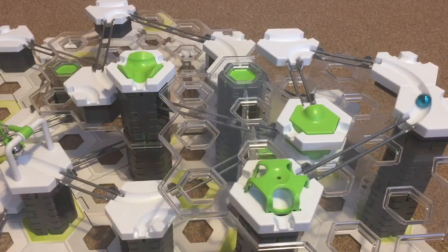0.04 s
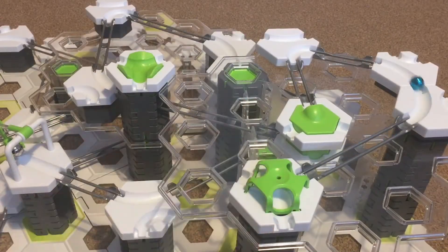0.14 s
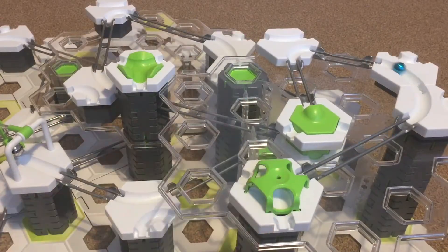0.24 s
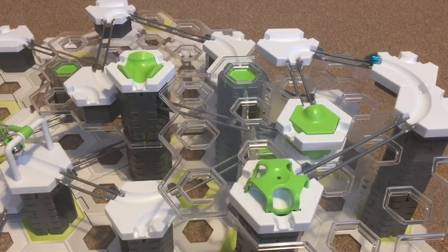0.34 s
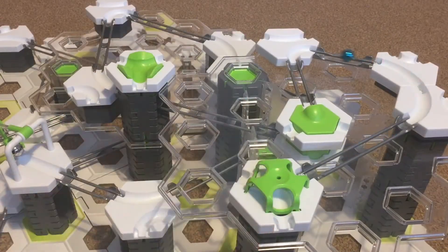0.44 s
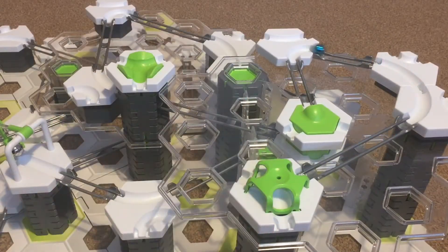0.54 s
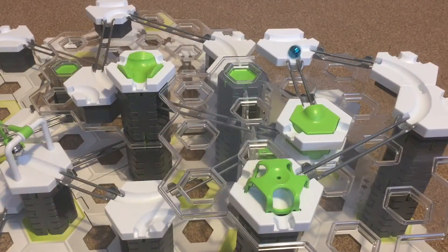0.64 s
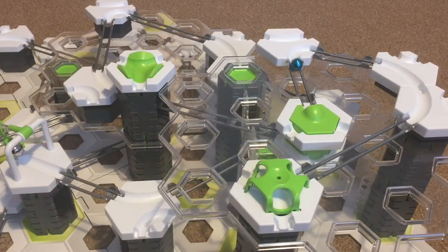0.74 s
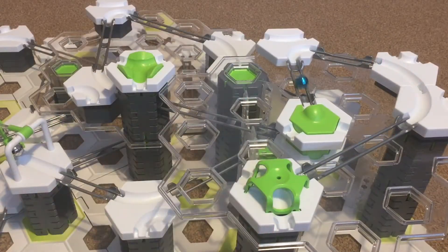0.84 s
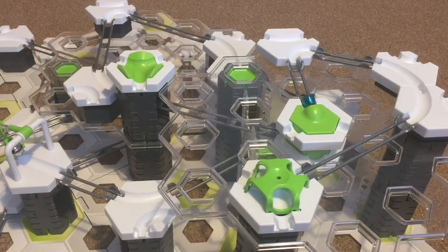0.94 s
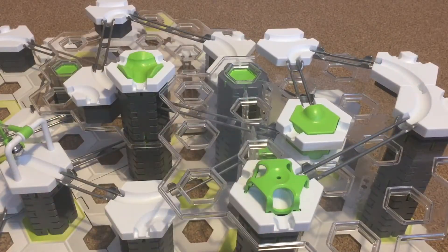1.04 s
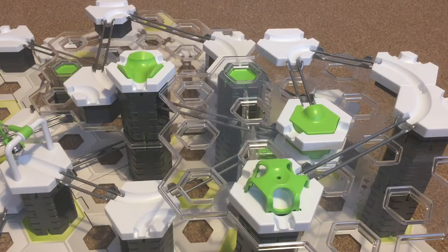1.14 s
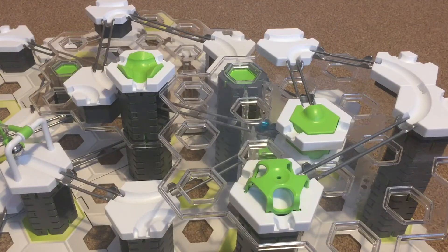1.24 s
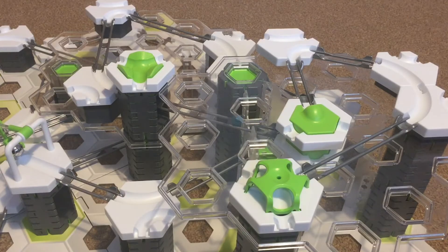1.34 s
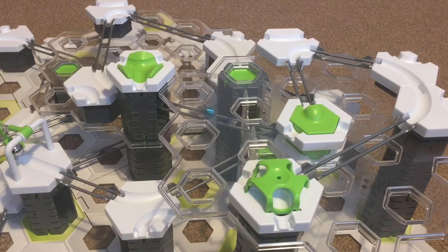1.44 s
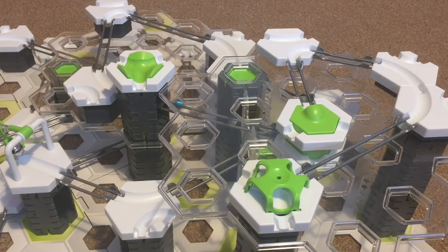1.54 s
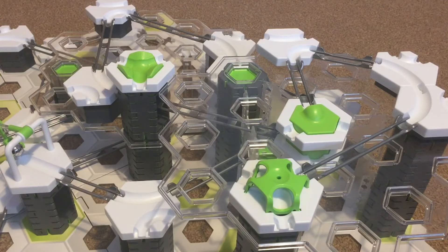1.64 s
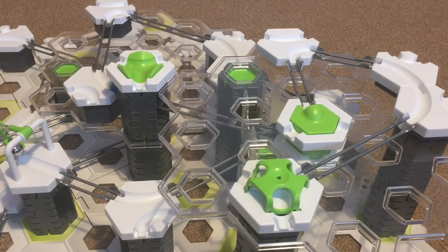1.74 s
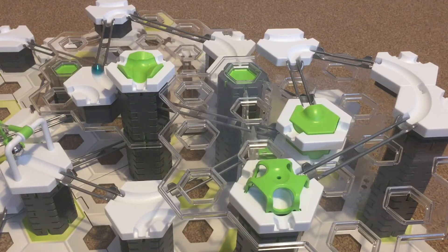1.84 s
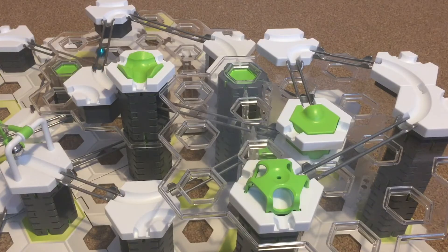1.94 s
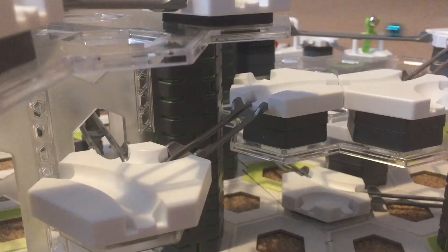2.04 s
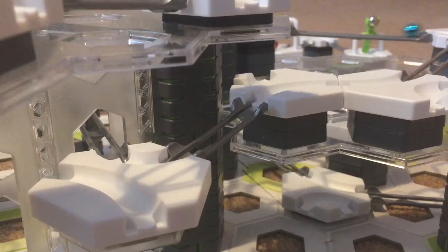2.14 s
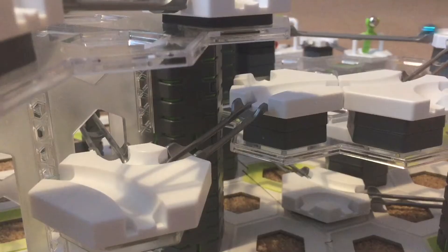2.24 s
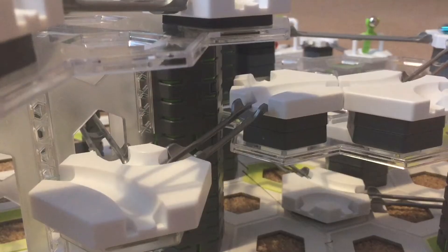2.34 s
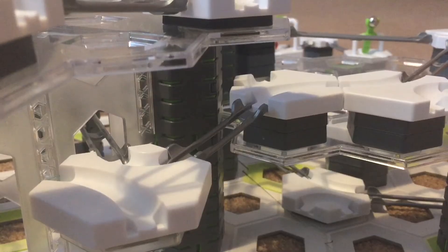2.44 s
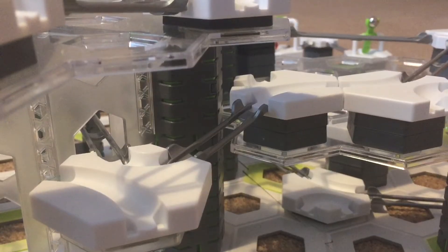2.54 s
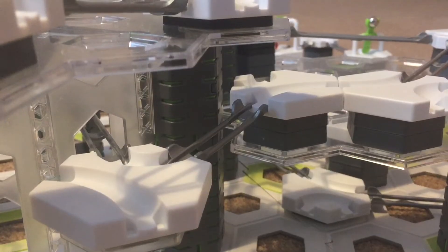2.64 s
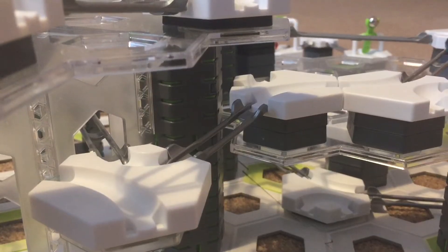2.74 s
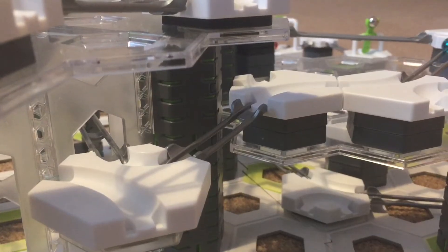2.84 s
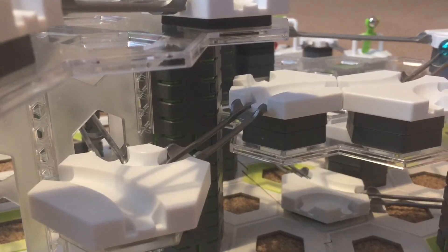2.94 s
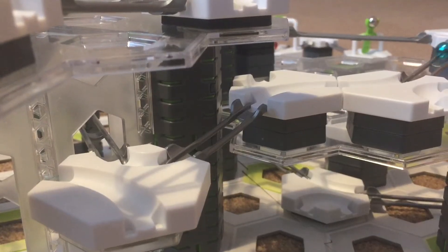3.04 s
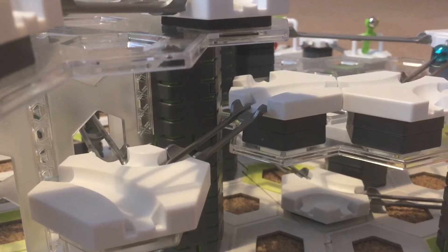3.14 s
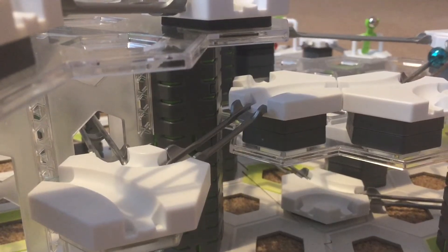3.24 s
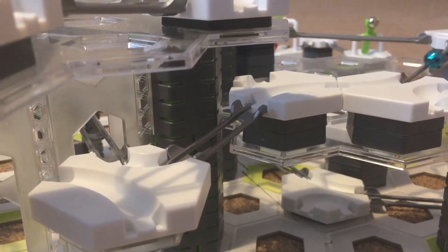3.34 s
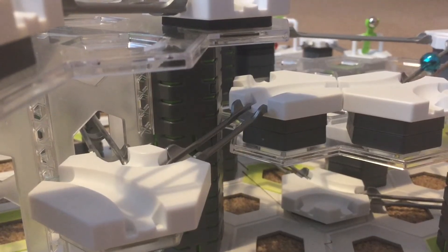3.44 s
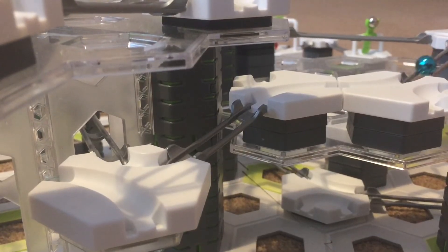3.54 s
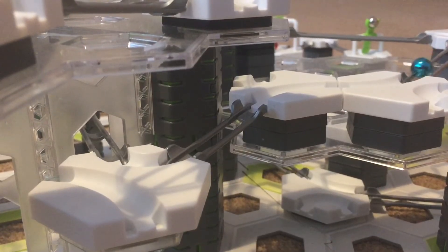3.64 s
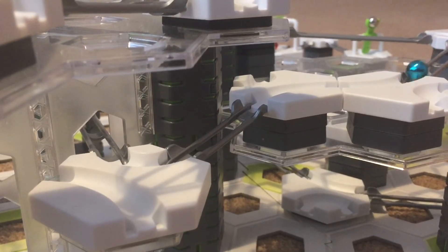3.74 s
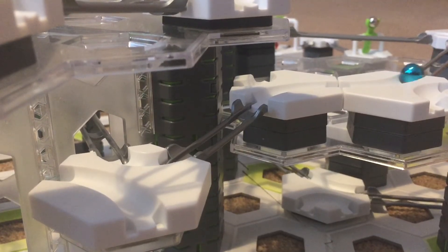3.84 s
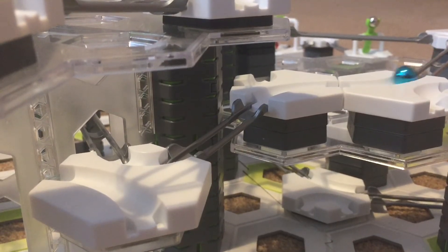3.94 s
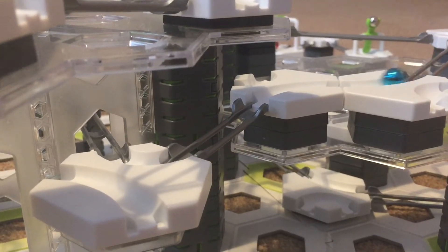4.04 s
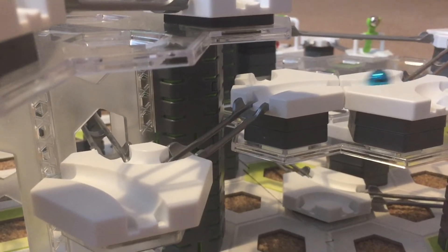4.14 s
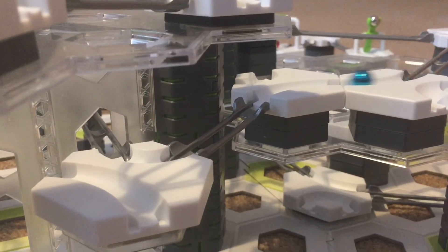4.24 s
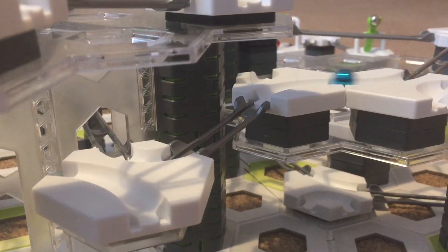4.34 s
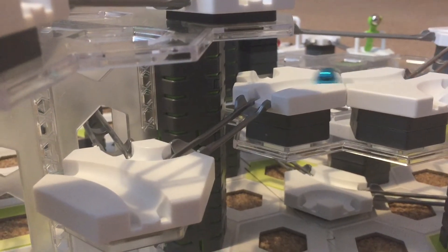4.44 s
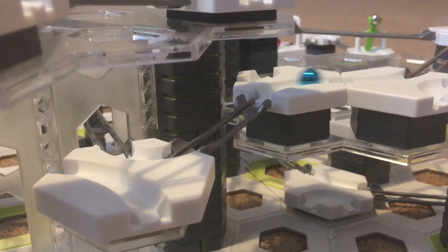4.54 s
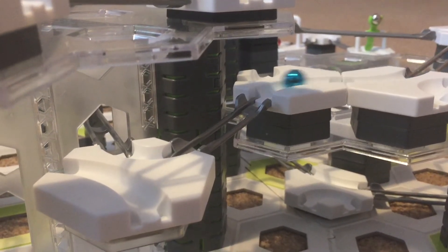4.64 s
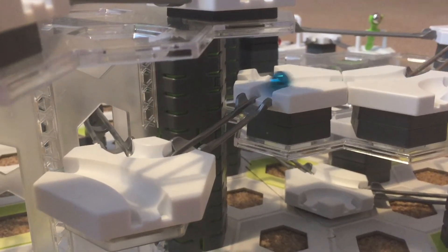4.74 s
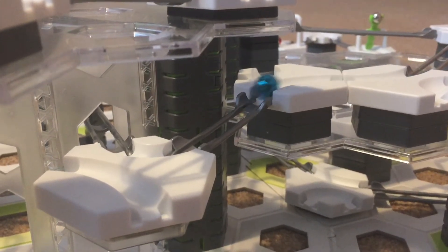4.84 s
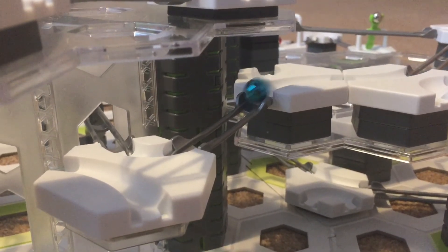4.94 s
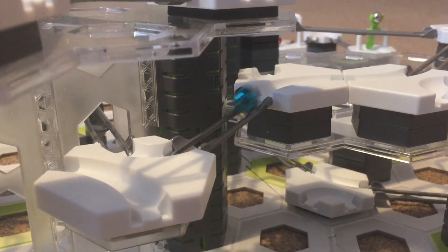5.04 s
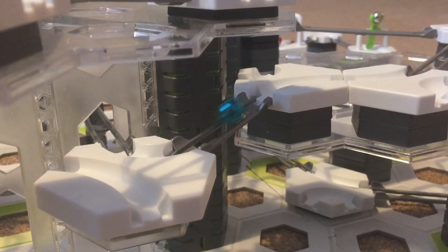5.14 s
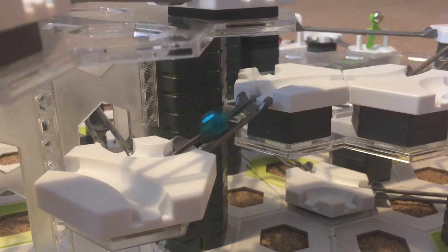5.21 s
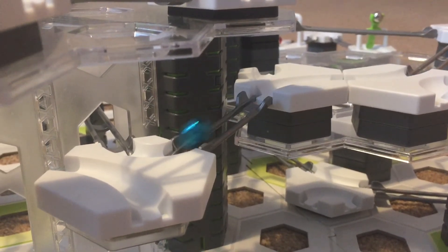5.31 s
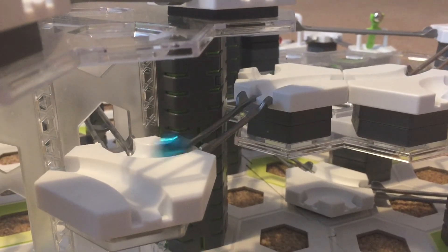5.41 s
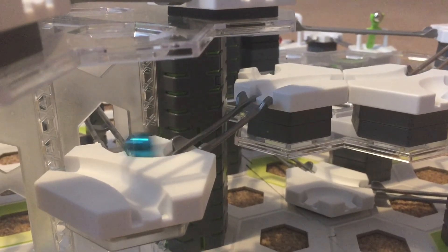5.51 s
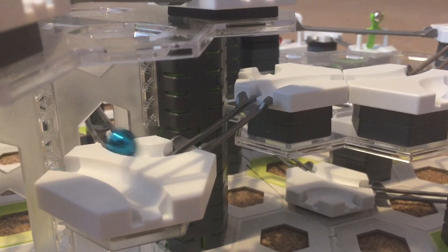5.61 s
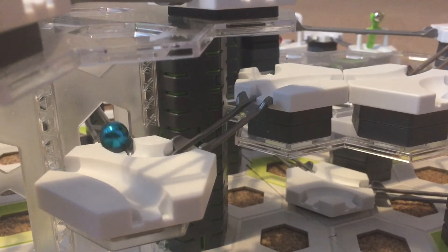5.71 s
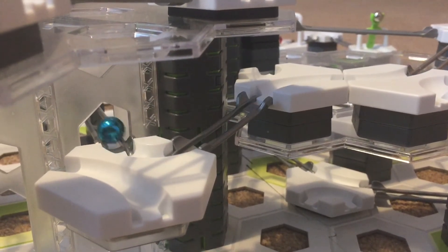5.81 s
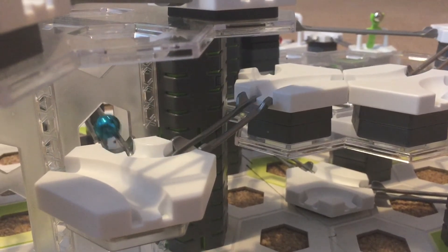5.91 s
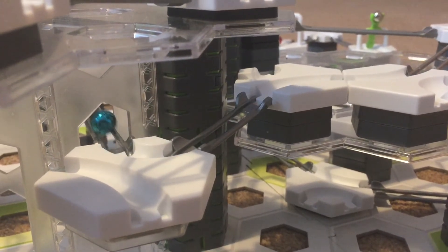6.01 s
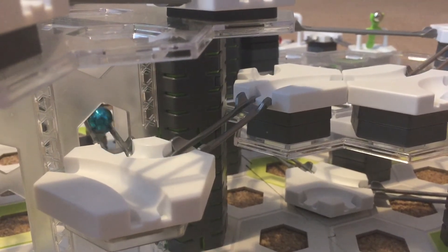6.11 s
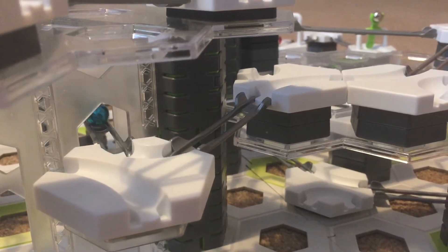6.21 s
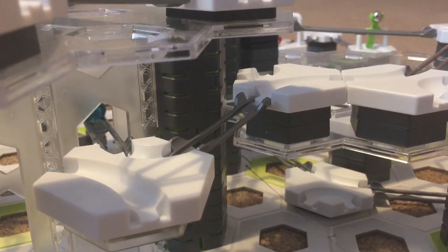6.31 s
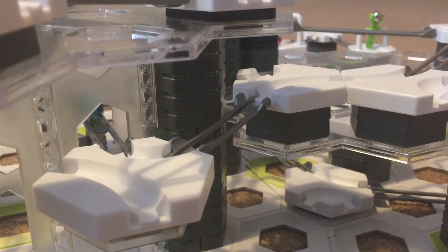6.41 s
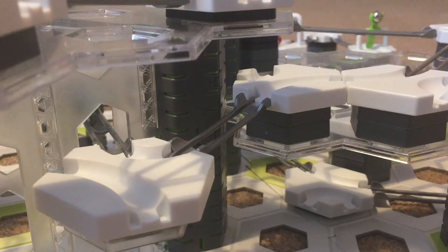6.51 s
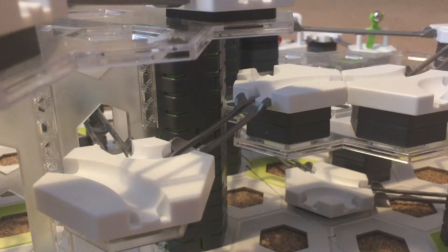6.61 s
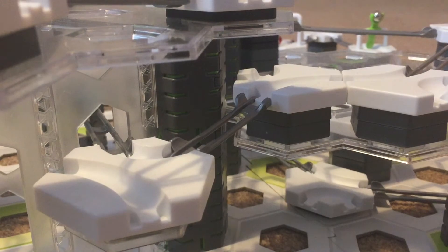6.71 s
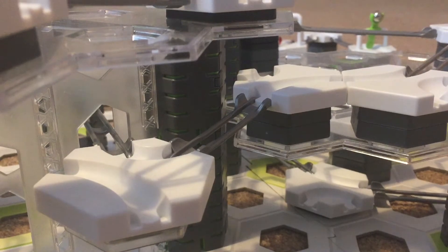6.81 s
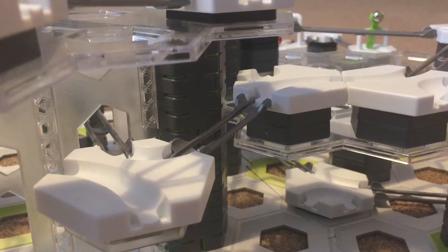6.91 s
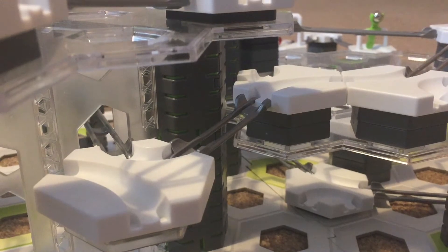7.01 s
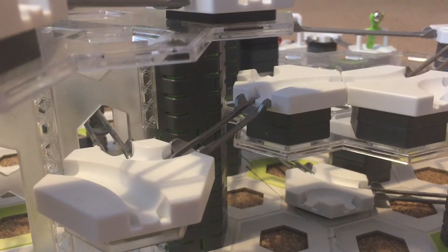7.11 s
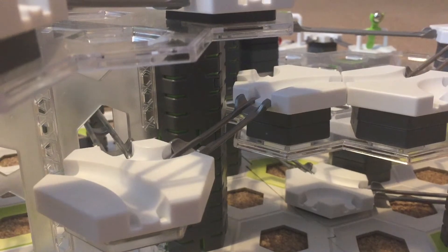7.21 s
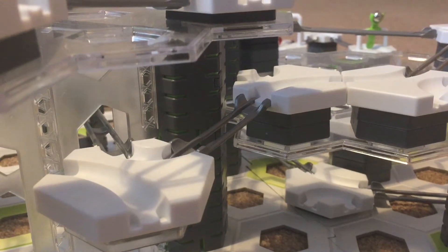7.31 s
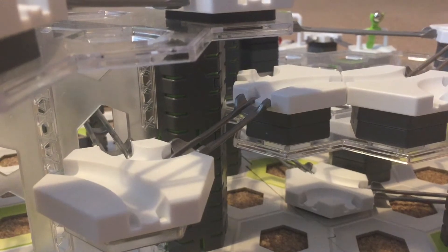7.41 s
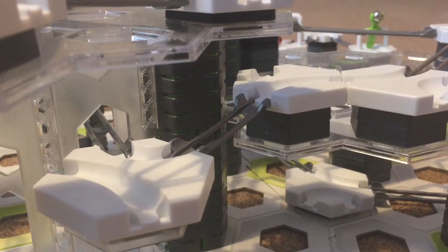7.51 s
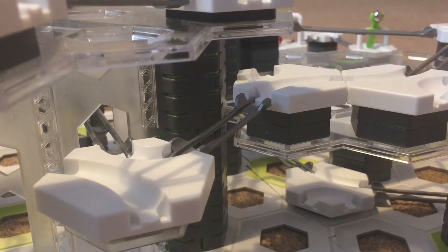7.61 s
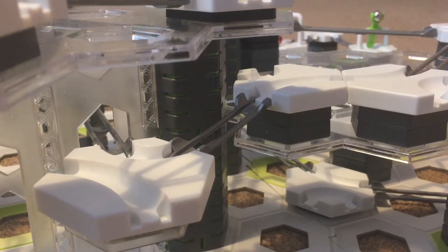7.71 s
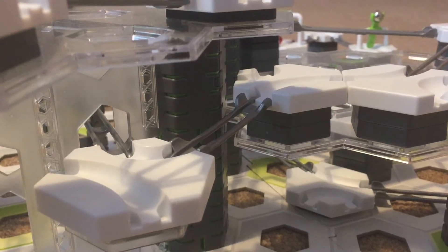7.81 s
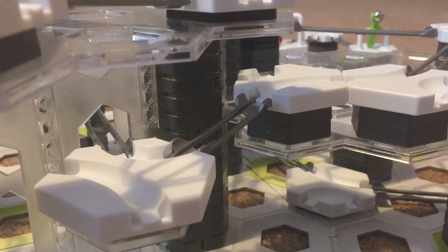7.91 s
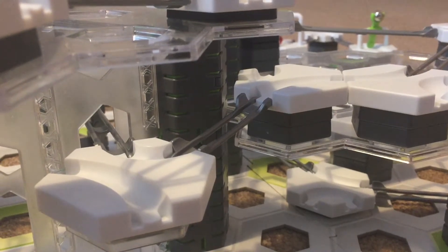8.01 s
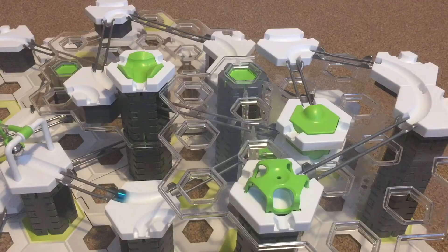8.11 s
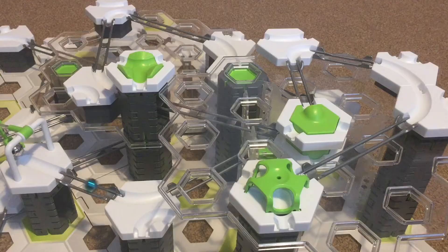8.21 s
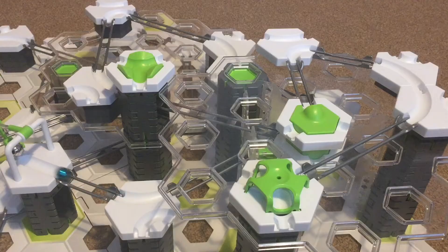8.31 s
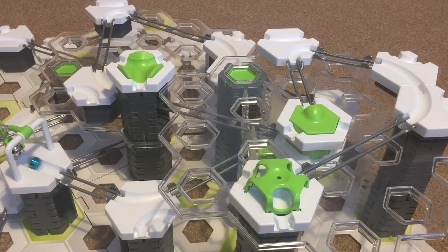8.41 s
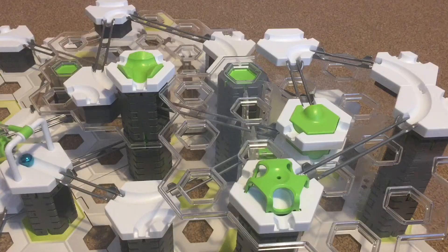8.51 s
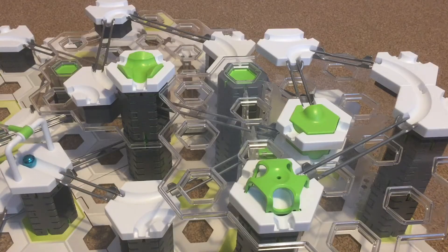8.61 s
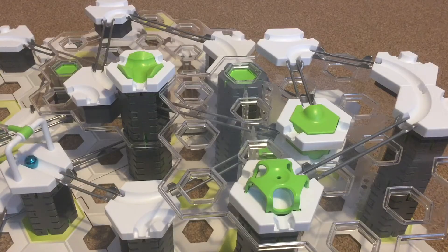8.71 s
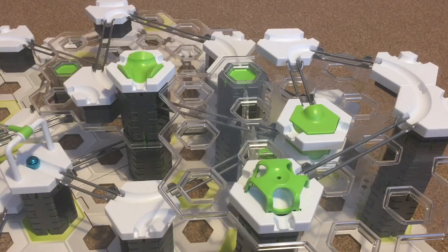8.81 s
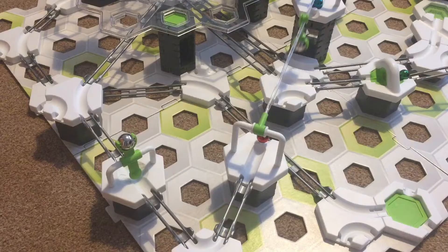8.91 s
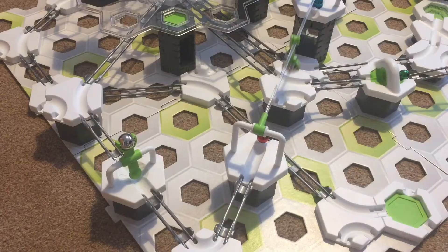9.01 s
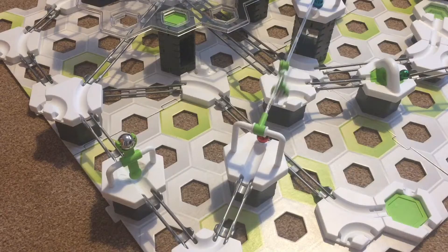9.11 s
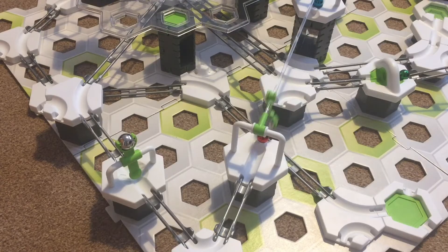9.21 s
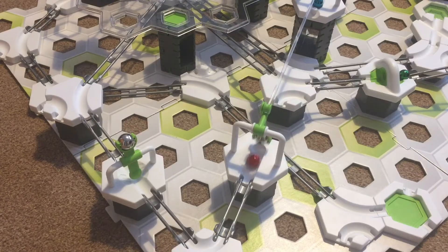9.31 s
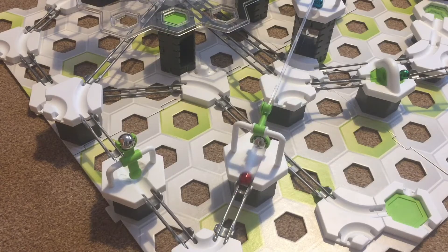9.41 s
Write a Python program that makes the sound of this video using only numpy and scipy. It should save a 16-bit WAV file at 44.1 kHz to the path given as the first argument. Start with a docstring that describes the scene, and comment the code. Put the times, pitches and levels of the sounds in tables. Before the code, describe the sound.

Hard little knocks of a steel marble crossing plastic pieces and wire rails, bright and fast at first, over a faint room hush. The sound drops to muffled slow-motion rolling, with deep hollow rumble and sparse, heavier clunks, one strong hit midway, then near silence and another burst. Crisp clicks return at normal speed, ending with two snappy ticks. Close microphone, short indoor reverberation.

```python
"""Hard knocks over a rumbling, chattering roll: steel marbles on a marble run on a carpeted floor.
Each joint or stop gives a knock: noise bursts and a short ring. Rolling is noise roughened by small bumps.
Plastic tiles and wire rails colour both; floor boards thump, the room answers, a quiet hush lies below.
Four shots are joined by short fades; the second, in slow motion, is lower and duller with sparser bumps."""
import sys
import numpy as np
from scipy import signal
from scipy.io import wavfile
from scipy.ndimage import uniform_filter1d

SR = 44100
rng = np.random.default_rng(int(sys.argv[2]) if len(sys.argv) > 2 else 0)


def materialize(psi):
    """Save the field psi as 16-bit PCM at rate SR to the path in sys.argv[1].

    A 1-D psi becomes a single channel; in a 2-D psi each row is a channel.
    """
    bounded = np.clip(np.atleast_2d(psi).T, -1, 1)
    quanta = np.round(bounded * 32767).astype(np.int16)
    wavfile.write(sys.argv[1], SR, quanta)


N = 417186
SLOWING = 2.6  # slow motion stretches time by this factor
TILE_HZ, RAIL_HZ, TOP_HZ = 1200, 4000, 18000  # upper edges of thud, knock and tick

# Knocks at joints and stops: t/s, knock drive level/dB, tick level above the knock/dB,
# loudest ring f/Hz, knock decay t60/s
KNOCKS = [(0.0014, -24.5, -6.5, 3820, 0.034), (0.0947, -35.5, -5.5, 1410, 0.033),
          (0.158, -31, -23, 3300, 0.02), (0.1981, -21.5, -15.5, 3810, 0.031),
          (0.38, -30.5, -15, 3860, 0.047), (0.4094, -27, 0.5, 1840, 0.063), (0.4884, -27, -7, 3020, 0.014),
          (0.496, -29.5, -6, 3060, 0.055), (0.557, -31.5, 2.5, 3800, 0.034), (0.569, -30.5, 3, 3000, 0.034),
          (0.6239, -35, -3.5, 2260, 0.42), (0.67, -21, -5.5, 3710, 0.038),
          (0.7683, -34.5, -3.5, 3630, 0.056), (0.847, -33.5, -5, 3860, 0.08),
          (0.924, -33, -8.5, 3060, 0.12), (0.994, -25.5, -7.5, 2060, 0.047),
          (1.025, -24.5, -18, 3415, 0.046), (1.091, -10, -1.5, 3360, 0.03), (1.1226, -6, 2.5, 3110, 0.039),
          (1.137, -12, -7, 1940, 0.021), (1.161, -26, 2, 3180, 0.072), (1.1739, -25, 6.5, 1930, 0.051),
          (1.219, -28, -5, 1900, 0.043), (1.2493, -53, 18, 1800, 0.11), (1.342, -40.5, -1.5, 5870, 0.083),
          (1.746, -49.5, 17, 1980, 0.14), (1.777, -32.5, 12.5, 6300, 0.028), (1.7982, -37.5, 7, 1900, 0.11),
          (1.9464, -34, 4, 1787, 0.041), (1.983, -38, 10.5, 6360, 0.055), (2.1879, -22, -3.5, 2550, 0.067),
          (2.2362, -30.5, -5.5, 2140, 0.24), (2.2557, -23, -9, 2100, 0.089),
          (2.557, -32.5, -21, 1000, 0.11), (2.6, -30, -13, 1000, 0.13), (2.632, -31, -33, 1295, 0.16),
          (2.6703, -23, -25, 1788, 0.083), (2.824, -22.5, -27, 1770, 0.07), (2.883, -21.5, -37, 979, 0.029),
          (3.7005, -27, -33, 1430, 0.14), (3.7489, -24.5, -33, 1485, 0.049),
          (3.9023, -24.5, -10.5, 618, 0.069), (4.1139, -33, -27.5, 1175, 0.057),
          (4.217, -40.5, -13, 900, 0.14), (4.295, -48, -8, 855, 0.048), (4.349, -41.5, -6.5, 900, 0.16),
          (4.4424, -12.5, -13, 1050, 0.041), (5.0214, -33.5, 9, 966, 0.07), (5.033, -19, -3, 2790, 0.058),
          (5.047, -20, -14, 2000, 0.07), (5.222, -28, 3.5, 1015, 0.055), (5.274, -34.5, -4.5, 1220, 0.05),
          (5.3872, -20.5, -0.5, 2340, 0.07), (5.4182, -23, -5, 983, 0.06), (5.449, -27.5, -10, 1013, 0.13),
          (5.5389, -8.5, -2, 1459, 0.13), (5.581, -19.5, -18.5, 1950, 0.029),
          (5.5982, -24, -24, 1270, 0.089), (5.7429, -30.5, -4.5, 543, 0.21), (5.806, -21, -41, 1288, 0.073),
          (5.876, -20.5, -35, 1478, 0.074), (6.029, -20.5, -23, 1730, 0.074),
          (6.0499, -14, -10, 1779, 0.049), (6.104, -27, -26, 518, 0.054), (7.381, -22.5, -31, 1920, 0.059),
          (7.3954, -10.5, -2, 2740, 0.038), (7.453, -19, -23, 1830, 0.06), (7.5263, -19, -9.5, 2800, 0.036),
          (7.556, -35.5, -29, 697, 0.11), (7.598, -29.5, -22, 1780, 0.049), (7.654, -26, -18, 373, 0.09),
          (8.037, -29, -18, 1917, 0.089), (8.2067, -31, 7, 1239, 0.07), (8.2722, -28.5, -1, 2870, 0.019),
          (8.287, -26, 2.5, 1523, 0.027), (8.33, -34, -3, 2120, 0.078), (8.3533, -28, 6, 2090, 0.029),
          (8.3996, -22, -9.5, 1484, 0.045), (8.515, -9, -2.5, 1885, 0.015), (8.527, -22, -11, 1440, 0.097),
          (8.6264, -27, 0, 4170, 0.06), (9.2925, -8, 4, 7180, 0.015), (9.349, -9, 5.5, 1590, 0.019)]
# Thud under each knock, one row per shot: level relative to the knock/dB
THUD_LEVELS = [-14.5, -13, -42, -12]


def blows(thud_lasts=1.4, tick_lasts=0.94, rise_s=0.0007, snap_db=12.5, lumps_db=3.2,
          ring_db=2.0, ring_width=100, damping=1.7):
    """Thud, knock and tick forces (a snap, then loose parts rattling), and the struck piece's own ring."""
    out, t = np.zeros((4, N + SR)), np.arange(8000) / SR
    for start, db, tick_db, hz, t60 in KNOCKS:
        thud_db = THUD_LEVELS[sum(start > join[0] for join in JOINS)]
        stretch = time_stretch(start)
        noise = rng.standard_normal((5, len(t)))

        # small rebounds make the rattle lumpy
        rebounds = evened(uniform_filter1d(noise[4], round(70 * stretch)))
        lumps = amp(lumps_db * np.minimum(t / 0.006, 1) * rebounds)
        lasts = t60 * np.array([[thud_lasts], [1], [tick_lasts], [1]])
        attack = 1 - np.exp(-t / (rise_s * stretch))
        force = attack * amp(-60 * t / lasts) * lumps * noise[:4]
        # dry, short blows start with a harder snap
        force[:, 8] += amp(snap_db) * 0.02 / t60 / stretch

        width = ring_width + damping / t60  # dry blows ring broad
        force[3] = resonate(force[3], hz, width) * np.sqrt(SR / (8 * width))
        # hard blows ring more
        ring_level = max(0, tick_db) + ring_db + 0.12 * (db + 23)
        level_db = np.array([[thud_db], [0], [tick_db], [ring_level]])
        out[:, round(start * SR):][:, :len(t)] += amp(db - 8.0 + level_db) * force
    return out[:, :N]


def crossing(t, start, length, on_s=0.014, off_s=0.016, sag_db=3.0):
    """Gain of one crossing: swell, slackening hold, fade; the edges are slower in slow motion."""
    along = np.clip((t - start) / length, 0, 1)
    # on_s and off_s are the times for 20 dB at full speed
    outside = np.maximum(start - t, 0) / on_s + np.maximum(t - start - length, 0) / off_s
    edge_db = 20 * np.minimum(outside / time_stretch(start), 10)
    return amp(-sag_db * (along - 0.5) - edge_db)


# The marble crossing one piece: start t/s, length t/s, drive level of the rumble in the tiles/dB,
# drive level of the chatter on the rails/dB, hollow of the piece f/Hz
PIECES = [(0, 0.1, -56, -52.5, 620), (0.085, 0.1, -51, -53, 1450), (0.222, 0.097, -54.5, -52.5, 648.4),
          (0.321, 0.096, -54.5, -53.5, 1590), (0.62, .14, -53.5, -53.5, 1461),
          (1.118, 0.1401, -60, -46, 1830), (1.581, 0.15, -74, -67, 1602),
          (1.759, 0.112, -54.5, -48.5, 1945), (1.868, .18, -60, -52, 1701), (2.19, .1, -46.5, -52.5, 2137),
          (2.325, 0.1, -43.5, -49.5, 520), (2.462, 0.07, -43.5, -51, 520),
          (2.554, 0.11, -41.5, -50.5, 467.7), (2.697, 0.21, -51.5, -51, 569.4),
          (3.746, .1, -49, -57, 623.4), (3.922, 0.1756, -44.5, -59, 492.8), (4.14, 0.41, -43, -62, 849),
          (4.561, 0.19, -47, -66, 900), (4.78, 0.15, -49.5, -65, 598.6), (4.959, 0.054, -48, -52, 559.9),
          (5.07, 0.11, -56, -52, 560), (5.228, .07, -53.5, -51, 540), (5.398, .09, -51, -47.5, 1000),
          (5.572, 0.21, -46.5, -43, 487.8), (5.764, 0.13, -43.5, -43, 596.2),
          (5.92, 0.3, -53.5, -53.5, 598), (6.809, .06, -56.5, -71, 341.9), (7.418, .11, -45.5, -56, 1779),
          (7.552, .18, -42, -49.5, 695.2), (7.771, 0.2, -44.5, -58.5, 464.4),
          (8.0, 0.11, -45.5, -48, 380.4), (8.196, 0.19, -71.5, -53, 1400), (8.413, 0.1, -60.5, -54.5, 1692),
          (8.53, 0.09, -64.5, -54.5, 1880), (9.303, 0.14, -51, -65, 1575)]


def rolling(slow, bumps_per_s=380, bump_db=3.3, bump_s=0.003, smooth=0.4, lumpy=0.95,
            hollow_db=-5.0, hollow_width=120, hollow_drift=0.035,
            deep_db=-5.0, deep_bias=0.56, bare_bias=4.8):
    """Rumble and chatter forces, noise swelling at every small bump, and the hollow piece humming."""
    start, length, rumble_db, chatter_db, hz = np.transpose(PIECES)
    t, coarse_t = np.arange(N) / SR, np.arange(0, N + 64, 64) / SR
    gains = np.array([crossing(coarse_t, *row) for row in zip(start, length)])
    rumble, chatter = [np.interp(t, coarse_t, np.sqrt(amp(2 * db) @ gains ** 2))
                       for db in (rumble_db, chatter_db)]

    # bumps come in the marble's own time, so slow motion spreads them out
    own_time = np.cumsum(np.where(slow, 1 / SLOWING, 1))
    bumps = amp(bump_db * np.minimum(rng.exponential(1, N), 4)) * (rng.random(N) < bumps_per_s / SR)
    rough = evened(signal.lfilter([1], [1, -np.exp(-1 / (bump_s * SR))], bumps))
    rough = np.interp(own_time, np.arange(N), rough)
    grit = rng.standard_normal((4, N))

    # each piece has its own hollow, so the hum steps from pitch to pitch and wanders a little
    piece_hz = uniform_filter1d(np.repeat(hz[gains.argmax(axis=0)], 64)[:N], 600)
    wander = uniform_filter1d(uniform_filter1d(rng.standard_normal(N), size=1500), size=1500)
    piece_hz = piece_hz * (1 + hollow_drift * evened(wander))
    r = np.exp(-np.pi * hollow_width / SR)
    sway = signal.lfilter([1], [1, -2 * r, r * r], grit[2:], axis=1)
    sway = (sway[0] + 1j * sway[1]) * np.where(slow, 1, 2)  # the hum stands out more at full speed
    hollow = evened((sway * np.exp(2j * np.pi * np.cumsum(piece_hz) / SR)).real)
    hollow = amp(hollow_db) * np.hypot(rumble, chatter) * hollow

    # tiles carry a deep body, bare rails hardly any
    deep = amp(deep_db) * rumble * (rumble / np.hypot(rumble, 3 * chatter)) ** deep_bias
    bare = (chatter / np.hypot(rumble, chatter)) ** bare_bias  # bare rails also hiss high up
    rumble_force = rumble * evened(1 + lumpy * rough) * grit[0]
    chatter_force = chatter * evened(smooth + rough) * grit[1]
    return rumble_force, chatter_force, bare * chatter_force, hollow, deep * grit[0]


# What tiles and rails ring with: f/Hz, width f/Hz, relative level/dB
TRACK = [(668.6, 60, -3.5), (1754, 170, -6), (3080, 65, -4), (3850, 120, -6.5), (6500, 160, -6),
         (8522, 550, -10)]
# Other pieces, in the last shot: f/Hz, width f/Hz, relative level/dB
LAST_TRACK = [(1636, 290, 0), (3480, 430, -4.5), (4250, 350, -9), (5540, 250, -5)]
# The pieces in slow motion: f/Hz, width f/Hz, relative level/dB
SLOWED_TRACK = [(369, 40, -2), (560, 190, -3), (771, 14, 1), (1190, 70, -8.5), (2024, 81, -4),
                (2306, 8.7, 3), (2870, 69, -3)]
# Colour of contact noise at full speed: f/Hz, relative level per Hz/dB
CONTACT = [(100, -19), (300, -8.5), (2000, -5), (4250, -7), (9000, -13), (10300, -21), (11500, -15),
           (16000, -24.5)]
# Colour of contact noise in slow motion: f/Hz, relative level per Hz/dB
SLOWED_CONTACT = [(80, -27.5), (220, 6.5), (1500, -0.5), (3000, -14.5), (4400, -19), (4800, -26.5),
                  (6200, -51.5)]


def track(forces, contact, modes, room_stretch, ring_db, chatter_top_hz, boom_db, room_db):
    """The forces shake tiles, rails and the floor boards, and the room answers."""
    thud, knock, tick, ring, rumble, chatter, hiss, hollow, deep = forces
    near = hollow + coloured(thud + rumble, contact, 190, TILE_HZ, modes, ring_db)
    near += coloured(deep, contact, 120, 280)
    near += coloured(knock, contact, TILE_HZ, RAIL_HZ, modes, ring_db)
    near += coloured(tick + hiss, contact, RAIL_HZ, TOP_HZ, modes, ring_db)
    near += coloured(chatter, contact, TILE_HZ, chatter_top_hz, modes, ring_db)
    boom = amp(boom_db) * resonate(resonate(rumble, 60, 40), 60, 40)
    answer = room(near + 0.55 * ring, room_stretch, 0.0067 * room_stretch)
    return near + ring + boom + amp(room_db) * answer


# The floor boards jolted: t/s, level/dB
THUMPS = [(0.692, -52), (2.67, -56.5), (5.05, -57), (5.418, -55.5), (7.451, -53.5), (7.72, -55),
          (9.344, -51)]


def thumps(hz=75, t60=0.48, slowed_hz=55, slowed_t60=0.65):
    """Low dying swings of the floor boards, lower and longer in slow motion."""
    t, out = np.arange(N) / SR, np.zeros(N)
    for start, db in THUMPS:
        f, lasts = (slowed_hz, slowed_t60) if in_slow_motion(start) else (hz, t60)
        decay = amp(db - 60 * abs(t - start) / lasts) * (t > start)
        out += decay * np.sin(2 * np.pi * f * (t - start))
    return out


# Room decay before stretching: f/Hz, t60/s
ROOM = [(300, 0.35), (3000, 0.27), (15000, 0.11)]


def room(x, stretch, gap_s):
    """Sparse taps of random sign, each band dying at its own speed."""
    taps = np.zeros(SR)
    at = np.arange(round(gap_s * SR), SR - 20, 12)
    taps[at + rng.integers(0, 12, len(at))] = rng.choice([-1.0, 1.0], len(at))
    hz, t, z = signal.stft(taps, SR, nperseg=256)
    t60 = stretch * read(ROOM, hz * stretch)
    tail = signal.istft(z * amp(-60 * t / t60[:, None]), SR, nperseg=256)[1]
    return signal.fftconvolve(x, tail / np.linalg.norm(tail))[:N]


# Room and microphone noise at full speed: f/Hz, relative level per Hz/dB
HUSH = [(18, -53), (30, -26), (71, -2.5), (2230, -14.5), (4420, -11.5), (16000, -33)]
# Room and microphone noise in slow motion: f/Hz, relative level per Hz/dB
SLOWED_HUSH = [(40, -4.5), (160, -16.5), (260, -10), (800, -10), (1830, -13), (3300, -29.5), (6000, -34.5)]


def hush(rms_db=-67.5):
    """Steady coloured noise of room and microphone."""
    return amp(rms_db) * coloured(rng.standard_normal(N), HUSH, 14, 20000)


def slowed_hush(rms_db=-61.5):
    """Stirring noise with a trace of the slowed pieces' resonances."""
    noise = coloured(rng.standard_normal(N), SLOWED_HUSH, 9.9, 20000, SLOWED_TRACK, 2.5)
    return amp(rms_db) * stirring(noise)


def stirring(x, patchy_db=2.2, swell_db=0.6):
    """The quiet is uneven: narrow patches come and go, and the whole swells a little."""
    z = signal.stft(x, nperseg=1024, noverlap=768)[2]
    patches = uniform_filter1d(rng.standard_normal(z.T.shape), size=14, axis=0)
    patches = uniform_filter1d(patches, size=3, axis=1)
    swell = uniform_filter1d(rng.standard_normal(z.shape[1]), size=14)
    z = z * amp(patchy_db * evened(patches).T + swell_db * evened(swell))
    return evened(signal.istft(z, nperseg=1024, noverlap=768)[1][:N])


# Joins between shots: t/s, fade-out t/s, fade-in t/s, level at the bottom/dB
JOINS = [(2.102, 0.022, 0.0061, -1), (8.17, 0.052, 0.0079, -66), (8.975, 0.027, 0.052, -28)]


def join_shots(mix):
    """Dips the level around each join: fade out, a few ms at the bottom, fade in."""
    t = np.arange(N) / SR
    for s, out_s, in_s, db in JOINS:
        corners = [s - out_s, s - 0.004, s + 0.0034, s + in_s]
        mix = mix * np.interp(t, corners, [1, amp(db), amp(db), 1])
    return mix


def in_slow_motion(t):
    """True between the first two joins, the span of the slow-motion shot."""
    return (t > JOINS[0][0]) & (t < JOINS[1][0])


def time_stretch(t):
    """Factor by which events starting at t are drawn out."""
    return SLOWING if in_slow_motion(t) else 1


def amp(db):
    """Decibels to linear gain."""
    return 10 ** (np.asarray(db) / 20)


def evened(x):
    """Scales to unit rms."""
    return x / np.sqrt(np.mean(x ** 2) + 1e-20)


def read(points, hz):
    """Reads a curve of (f, value) points, straight over log frequency."""
    f, value = np.transpose(points)
    return np.interp(np.log(hz + 1), np.log(f + 1), value)


def coloured(x, points, lo_hz, hi_hz, modes=(), ring_db=0.0):
    """Causal filter of unit power: a smooth spectrum, resonances on top of it, one band kept."""
    hz = np.fft.rfftfreq(8192, 1 / SR)
    ring = sum(amp(2 * db) / (1 + (2 * (hz - f) / w) ** 2) for f, w, db in modes)
    gain = amp(read(points, hz)) * np.sqrt(1 + amp(2 * ring_db) * ring)
    gain = gain / np.sqrt((1 + (lo_hz / (hz + 1)) ** 6) * (1 + (hz / hi_hz) ** 6))
    # minimum phase: the filter answers at once, without ringing ahead
    log = np.log(gain / gain.max() + 1e-5)
    log = np.concatenate([log, log[-2:0:-1]])
    taps = np.fft.ifft(np.exp(np.conj(signal.hilbert(log)))).real[:4096]
    return signal.oaconvolve(x, taps / np.linalg.norm(taps))[:N]


def resonate(x, hz, width):
    """Shifts hz down to zero, smooths, and shifts back: a resonance of gain 1."""
    turn = np.exp(2j * np.pi * np.cumsum(hz * np.ones(len(x))) / SR)
    r = np.exp(-np.pi * width / SR)
    return 2 * (turn * signal.lfilter([1 - r], [1, -r], x / turn)).real


def low_pass(x, hz):
    """Steep linear-phase low-pass."""
    return signal.oaconvolve(x, signal.firwin(1023, hz, window=("kaiser", 10), fs=SR), "same")


def scene():
    """Full-speed shots and the slow-motion shot, each with its own hush, joined by fades."""
    t = np.arange(N) / SR
    slow, last = in_slow_motion(t), t > JOINS[2][0]
    forces = np.vstack([blows(), rolling(slow)])

    live = hush()
    for shots, modes in [(~slow & ~last, TRACK), (last, LAST_TRACK)]:
        live += track(forces * shots, CONTACT, modes, room_stretch=0.93, ring_db=9.8,
                      chatter_top_hz=3900, boom_db=5.9, room_db=-10.5)
    slowed = track(forces * slow, SLOWED_CONTACT, SLOWED_TRACK, room_stretch=0.99, ring_db=9.6,
                   chatter_top_hz=5400, boom_db=4.6, room_db=-11.5)
    slowed += slowed_hush()

    # the band limit of the microphone chain comes down with the slowing
    mix = np.where(slow, low_pass(slowed, 15850 / SLOWING), live)
    return join_shots(mix + thumps())[None]


def record(dry, edge_hz=16500):
    """Band limit, with a trace of converter noise."""
    hiss = amp(-99) * rng.standard_normal(N)
    return low_pass(dry[0] + hiss, edge_hz)[None]


dry = scene()
out = record(dry)
materialize(out)
```